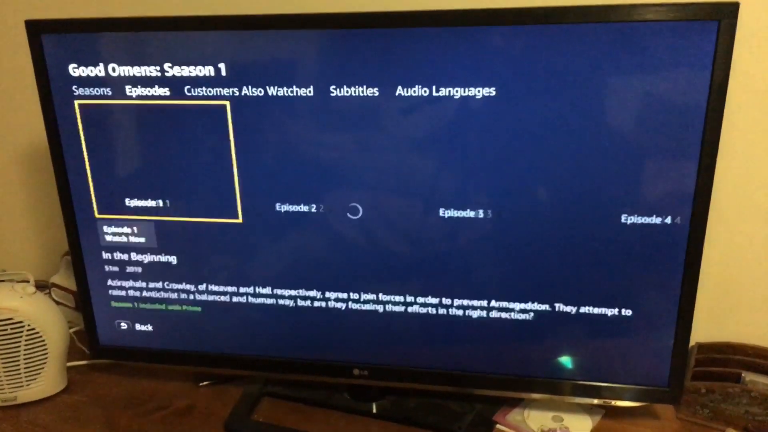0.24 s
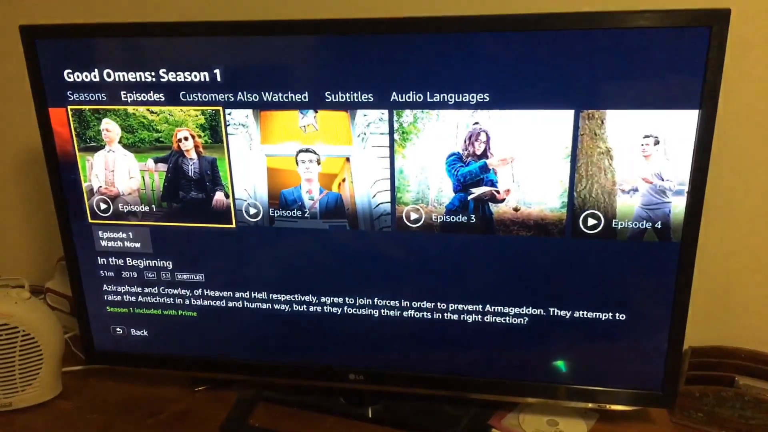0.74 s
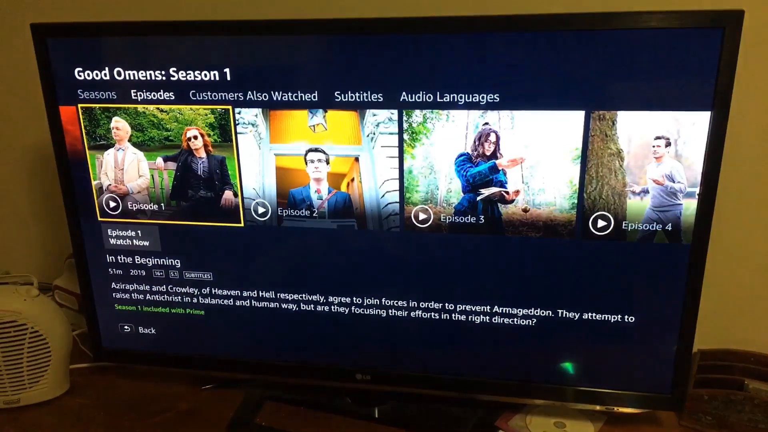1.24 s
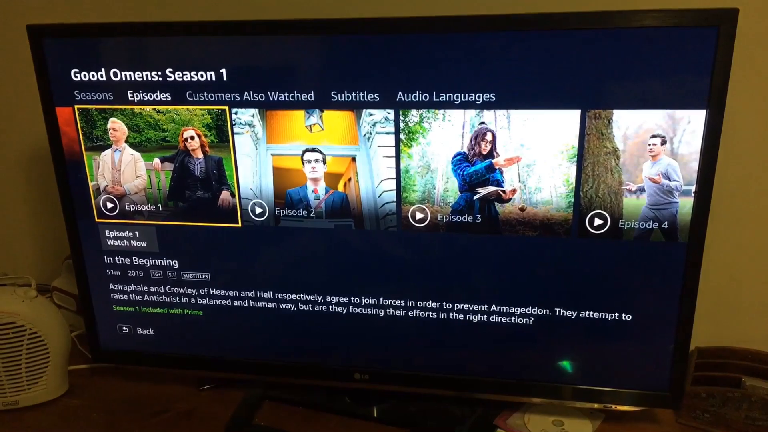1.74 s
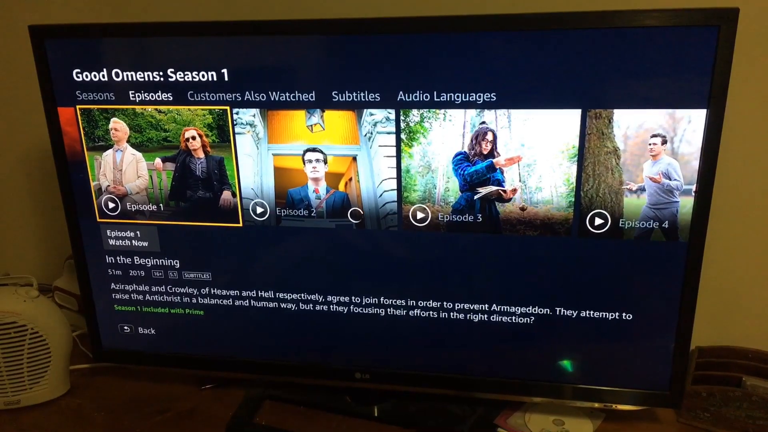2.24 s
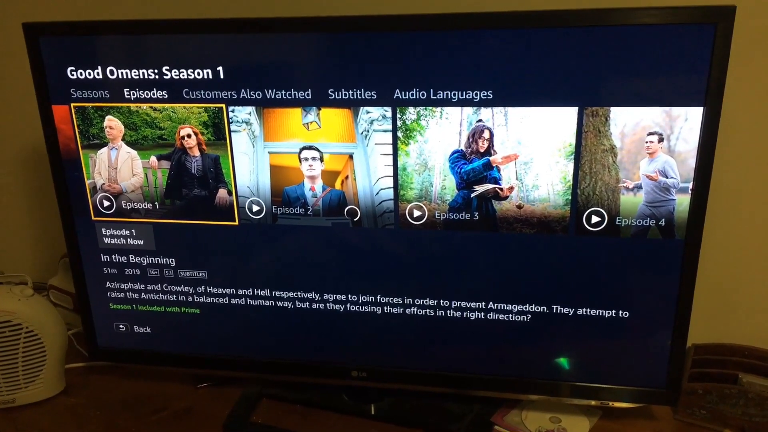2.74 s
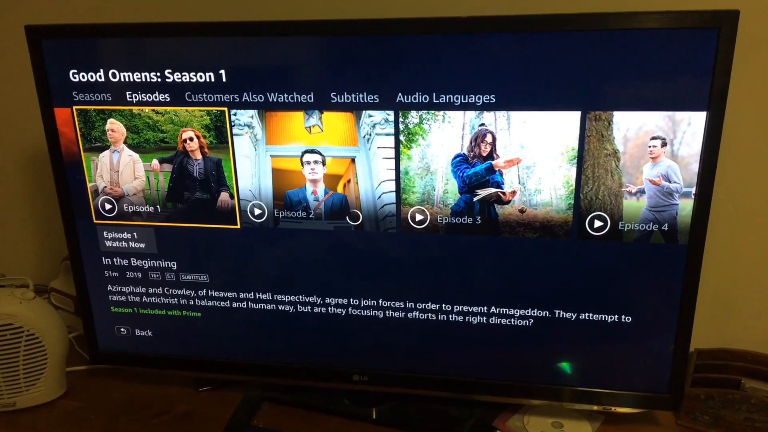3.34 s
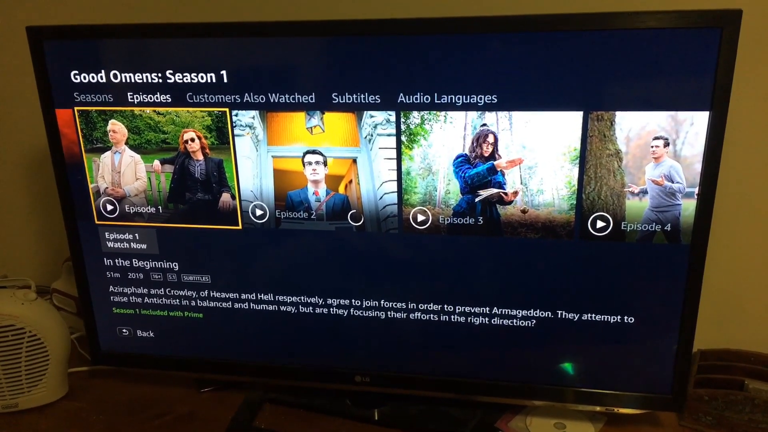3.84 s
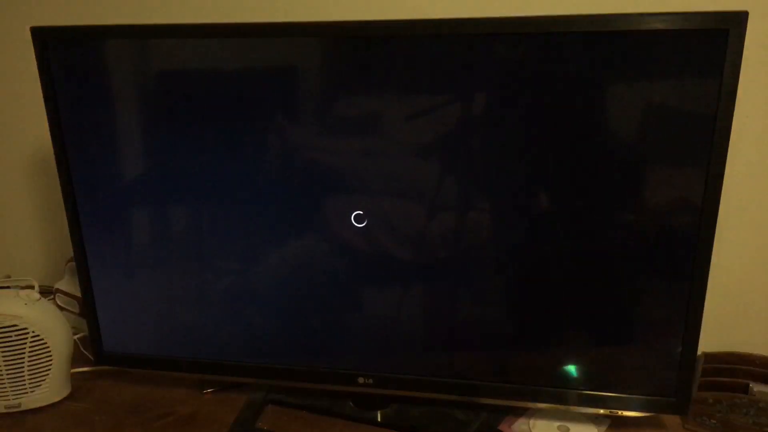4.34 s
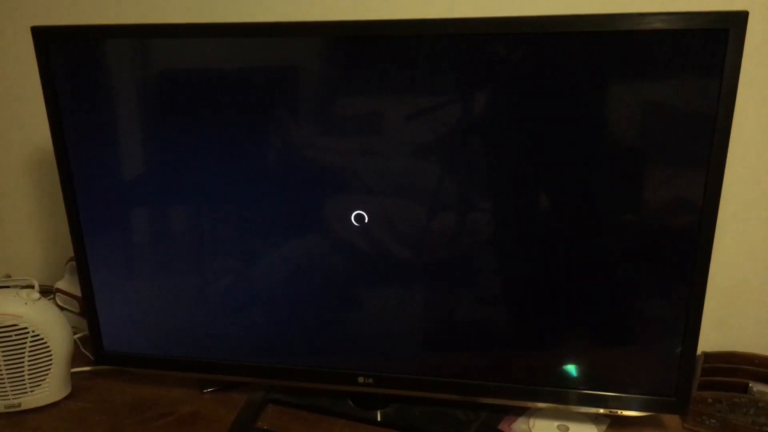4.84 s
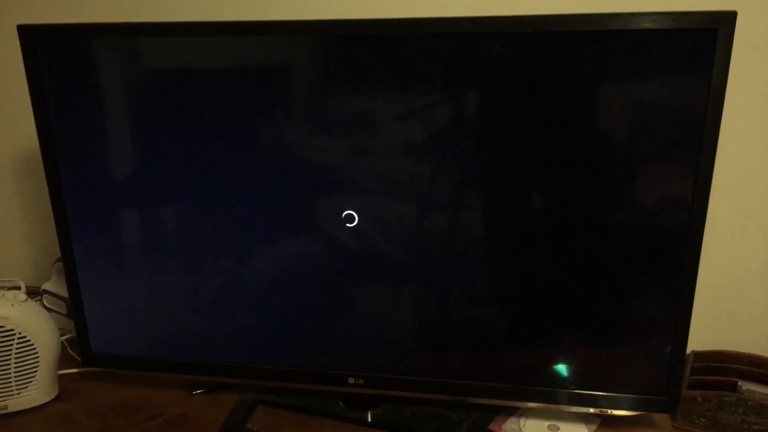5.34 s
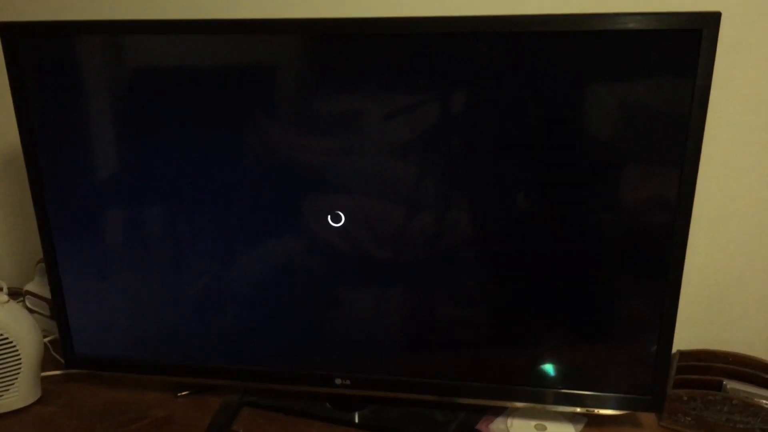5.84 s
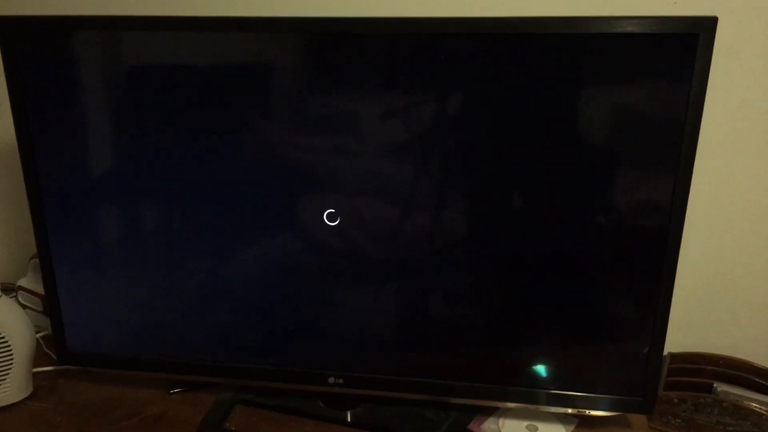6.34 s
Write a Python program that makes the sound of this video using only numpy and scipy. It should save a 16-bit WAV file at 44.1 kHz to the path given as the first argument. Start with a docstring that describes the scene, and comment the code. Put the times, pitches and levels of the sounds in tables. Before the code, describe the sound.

An appliance motor hums low and steady in a quiet room, throbbing slightly over a faint rumble and hiss. Against it, a remote control is handled, its sharp plastic clicks ringing briefly off the walls. A few light clicks and a soft rub of fingers come in the first second. At about 1.4 and 1.6 seconds one key goes down and up, dry and close to the microphone. A button pops at 2.7 seconds, and small clicks lead to the loudest snap at about 3.4, with a short hollow ring. Springy button pops bunch together around 4.5 seconds. A quick run of clicks follows from 5.3 to 5.8, then another firm snap at 6.2. Faint finger slides and light taps on the case continue to the end, at about 6.6 seconds.

```python
"""Sharp plastic clicks come from a remote control being handled in a quiet room.
Its keys and case snap and ring, springy domes pop under firm presses, and the walls answer briefly.
Fingers slide and tap on the plastic; one key goes down and up right beside the microphone, dry and close.
Behind it all, an appliance motor hums low, with a slight throb, over a faint rumble and hiss."""
import sys
import numpy as np
from scipy import signal
from scipy.fft import rfft, irfft, next_fast_len
from scipy.io import wavfile
from scipy.ndimage import map_coordinates

SR = 44100
rng = np.random.default_rng(int(sys.argv[2]) if len(sys.argv) > 2 else 0)


def int16_out(signal):
    """Quantize to a 16-bit WAV file."""
    q = np.round(np.clip(np.atleast_2d(signal).T, -1, 1) * 32767)
    wavfile.write(sys.argv[1], SR, q.astype(np.int16))


N = 291060  # 6.6 seconds


def amp(db):
    """Turn decibels into a number to multiply by."""
    return 10 ** (np.asarray(db) / 20)


def value_at(points, hz):
    """Read between (pitch_hz, value) points on a logarithmic pitch scale."""
    pitches, values = np.transpose(points)
    return np.interp(np.log(hz + 1), np.log(pitches + 1), values)


def wobble(rate_hz):
    """A smooth random curve that passes through rate_hz new values a second."""
    values = rng.standard_normal(int(N * rate_hz / SR) + 4)
    return map_coordinates(values, [np.arange(N) * rate_hz / SR])


def filtered(sound, gain_at):
    """Turn each frequency of a sound up or down by gain_at(hz)."""
    size = next_fast_len(N + SR // 2)
    return irfft(rfft(sound, size) * gain_at(np.fft.rfftfreq(size, 1 / SR)), size)[:N]


def coloured(noise, spectrum):
    """Shape noise with (pitch_hz, level_db) points, then set its average (rms) level to 1."""
    shaped = filtered(noise, lambda hz: amp(value_at(spectrum, hz)))
    return shaped / np.sqrt(np.mean(shaped ** 2) + 1e-20)


def swells(rows, rise_db_per_s, fall_db_per_s):
    """A volume curve: each event fades in up to its start, holds for its length, then fades out."""
    t = np.arange(N) / SR
    gain = np.zeros(N)
    for start_s, length_s, level_db in rows:
        before_s = np.maximum(start_s - t, 0)
        after_s = np.maximum(t - start_s - length_s, 0)
        gain += amp(level_db - rise_db_per_s * before_s - fall_db_per_s * after_s)
    return gain


def add(track, start_s, sound):
    """Mix a sound into the track at the given time."""
    start = max(round(start_s * SR), 0)
    part = track[start:start + len(sound)]
    part += sound[:len(part)]


# Tone of the building's rumble and of the hiss: pitch_hz, relative_db
RUMBLE_SPECTRUM = [(15, -34), (45, 13.5), (62, -1.5), (105, -5.5), (135, -5), (200, -5.5), (330, -10),
                   (520, -15), (1200, -33)]
HISS_SPECTRUM = [(100, -7), (400, -6.5), (800, 0), (2000, 0), (3200, -5), (4200, -5.5), (7000, -8.5),
                 (9300, -7.5), (10500, -11), (12500, -5.5), (15500, -8.5), (16500, -5.5)]
def room_air(rumble_db=-66, hiss_db=-66):
    """The building rumbles low under a smooth hiss."""
    rumble = amp(rumble_db) * coloured(rng.standard_normal(N), RUMBLE_SPECTRUM)
    hiss = amp(hiss_db) * coloured(rng.standard_normal(N), HISS_SPECTRUM)
    return rumble + hiss


# Jolts of the microphone: start_s, length_s, level_db
JOLTS = [(0, 0.018, -54), (3.25, .05, -62), (5.62, .15, -58.5), (6.4, .15, -56)]
# Tone of the shaking: pitch_hz, relative_db
SHAKE_SPECTRUM = [(8, -21), (20, 16), (30, -4.5), (45, -7.5), (62, 5), (100, -27), (200, -18), (500, -75)]
def microphone_shake(resting_db=-72):
    """The hand holding the microphone makes a deep rumble that swells with each jolt."""
    gain = amp(resting_db) + swells(JOLTS, rise_db_per_s=53, fall_db_per_s=49)
    return gain * coloured(rng.standard_normal(N), SHAKE_SPECTRUM)


# Weak tones above the hum: pitch_multiple, relative_db
OVERTONES = [(2, -30), (3, -54.5), (6, -55)]
# How deeply the hum throbs (a minus sign flips the beat): time_s, depth_db
THROB_DEPTH = [(0, 1.2), (4.3, 0), (4.6, -0.8), (6.6, 1.5)]
# Thin steady whines, in two matching lists: pitch_hz and level_db
WHINE_HZ = (90, 105.5, 199.8, 310.6)
WHINE_DB = (-76, -74, -78, -80.5)
def motor_hum(level_db=-42, pitch_hz=48.8, throb_hz=7.7, flutter_db=0.9):
    """A turning induction motor makes a low, throbbing tone, weak overtones and thin whines."""
    t = np.arange(N) / SR
    turn = 2 * np.pi * t  # phase of a 1 Hz tone
    overtones = sum(amp(db) * np.sin(multiple * pitch_hz * turn + 0.52 * wobble(2.38))
                    for multiple, db in OVERTONES)
    hum = np.sin(pitch_hz * turn) + overtones
    whine = sum(amp(db) * np.sin(hz * turn + 0.42 * wobble(2.62)) for hz, db in zip(WHINE_HZ, WHINE_DB))
    depth_db = np.interp(t, *np.transpose(THROB_DEPTH))
    throb_db = depth_db * np.sin(throb_hz * turn + wobble(1.81))
    unsteady_db = flutter_db * wobble(8.5)
    return np.sqrt(2) * (amp(level_db + throb_db + unsteady_db) * hum + whine)


# How long the room takes to fade by 60 dB: pitch_hz, fade_s
ROOM_FADE = [(200, 0.11), (600, 0.38), (1500, 0.36), (3000, 0.38), (6000, 0.38), (10000, 0.29),
             (16000, 0.2)]
def room_tail(build_s, late_db, late_stretch):
    """The walls' blurred answer, at energy 1; a faint part lasts late_stretch times as long."""
    hz, t, noise = signal.stft(rng.standard_normal(SR * 2 // 3), SR, nperseg=256)
    fade_s = value_at(ROOM_FADE, hz)[:, None]
    fade = amp(-60 * t / fade_s) + amp(late_db - 60 * t / (late_stretch * fade_s))
    tail = signal.istft(noise * fade, SR, nperseg=256)[1]
    age_s = np.arange(len(tail)) / SR
    tail *= 1 - np.exp(-(age_s / build_s) ** 2)
    return tail / np.linalg.norm(tail)


# Movements of the hands: start_s, length_s, level_db
RUSTLES = [(0, 0.6, -70), (3.08, 0.32, -68)]
# Tone of the rustle: pitch_hz, relative_db
RUSTLE_SPECTRUM = [(80, -14), (150, -5.5), (350, 5.5), (480, -9), (1000, -18.5)]
def hand_rustle(uneven_db=3.0):
    """A soft, dull rustle comes and goes as the hands move."""
    gain = swells(RUSTLES, rise_db_per_s=62, fall_db_per_s=110)
    return gain * amp(uneven_db * wobble(15)) * coloured(rng.standard_normal(N), RUSTLE_SPECTRUM)


# Fingers sliding on the plastic: start_s, length_s, relative_db
SLIDES = [(0.121, 0.69, -62), (1.093, 0.93, -70.5), (2.318, 0.034, -67.5), (3.1, .72, -63.5),
          (4.18, 0.64, -65), (5.354, 0.53, -63.5), (6.006, 0.059, -57), (6.286, .17, -51.5)]
# Tone of the rubbing: pitch_hz, relative_db
RUB_SPECTRUM = [(300, -25), (900, 0.5), (2000, 4), (4200, -1.5), (7000, -6.5), (16000, -14)]
def finger_slides(gain_db=-4, roughness=1.1, grain_samples=32):
    """Fingers stick and slip on the case, making faint grains of noise of very uneven strength."""
    noise = rng.standard_normal(N)
    strengths = np.exp(roughness * rng.standard_normal(N // grain_samples + 1) / 2)
    grains = noise * np.repeat(strengths, grain_samples)[:N]
    gain = amp(gain_db) * swells(SLIDES, rise_db_per_s=128, fall_db_per_s=128)
    return gain * coloured(grains, RUB_SPECTRUM)


# Notes left hanging by firm presses: start_s, pitch_hz, relative_db
HOLLOW_NOTES = [(.353, 3810, -57), (3.215, 855, -47.5), (3.351, 1200, -38.5), (3.352, 427, -54),
                (4.58, 865, -49), (6.186, 1470, -45)]
def hollow_case(decay_s=0.0038, gain_db=27):
    """A firm press sounds a short note in the hollow case, and the walls draw it out."""
    out, t = np.zeros(N), np.arange(SR // 25) / SR
    for start_s, pitch_hz, db in HOLLOW_NOTES:
        note = np.exp(-t / decay_s) * np.sin(2 * np.pi * pitch_hz * t)
        ring = signal.fftconvolve(note, room_tail(build_s=0.00037, late_db=-40, late_stretch=1.2))
        add(out, start_s, amp(db + gain_db) * ring / np.linalg.norm(ring))
    return out


# The close key going down, then up: start_s, level_db
KEY_STROKES = [(1.4025, -30.5), (1.5698, -31)]
# The tones it rings with: pitch_hz, relative_db, rise_s
KEY_TONES = [(7450, -2, 0.000082), (4450, -15.5, 0.00066), (2890, 0.5, 0.0005), (1870, -12.5, 0.001),
             (1270, -7.5, 0.00045), (855, -3, 0.00063), (540, -13, 0.00066), (290, -39, 0.00044)]
def close_key(room_db=-16, travel_at_1khz_s=0.00155):
    """High tones travel faster through bending plastic, so each stroke is a tiny falling chirp."""
    out, t = np.zeros(N), np.arange(SR // 50) / SR
    for start_s, level_db in KEY_STROKES:
        stroke = np.zeros(len(t))
        for pitch_hz, relative_db, rise_s in KEY_TONES:
            delay_s = travel_at_1khz_s * min((1000 / pitch_hz) ** 2, 1.4)
            age_s = np.maximum(t - delay_s, 0)
            swell = age_s / rise_s * np.exp(1 - age_s / rise_s)
            detuned_hz = pitch_hz * (1 + rng.normal(0, 0.0097))
            stroke += amp(level_db + relative_db) * swell * np.sin(2 * np.pi * detuned_hz * age_s)
        add(out, start_s, stroke)
        tail = room_tail(build_s=0.0045, late_db=-28, late_stretch=1.2)
        add(out, start_s, amp(room_db) * signal.fftconvolve(stroke, tail))
    return out


# Springy domes giving way under the keys: start_s, level_db
POPS = [(2.722, -29), (4.1492, -32), (4.4928, -23.5), (4.5734, -20), (5.4355, -31), (5.593, -40.5)]
def dome_pops(pitch_hz=2086, decay_s=0.0017, bass_cut_hz=1300, room_db=-3.5):
    """A dome buckles with one short, hard knock; it is too small to give off bass."""
    out, t = np.zeros(N), np.arange(SR // 50) / SR
    note = np.exp(-t / decay_s) * np.sin(2 * np.pi * pitch_hz * t)
    pop = signal.lfilter(*signal.butter(2, bass_cut_hz, 'high', fs=SR), note)
    for start_s, level_db in POPS:
        add(out, start_s, amp(level_db) * pop)
        tail = room_tail(build_s=0.0023, late_db=-45, late_stretch=1.1)
        add(out, start_s, amp(level_db + room_db) * signal.fftconvolve(pop, tail))
    return out


def snap(decay_s, samples=512):
    """A catch lets go in a burst of tiny slips, spread evenly over all pitches, at energy 1."""
    t = np.arange(samples) / SR
    fade = np.exp(-t / decay_s) * (1 - np.exp(-4 * t / decay_s))
    spectrum = rfft(rng.standard_normal(samples) * fade)
    burst = irfft(spectrum / np.abs(spectrum)) * np.sqrt(fade)
    return burst / np.linalg.norm(burst)


def shortest_ring(gains):
    """The quickest ring with these gains from low to high pitch (minimum phase), at energy 1."""
    cepstrum = irfft(np.log(np.maximum(gains, 1e-6)))
    half = len(cepstrum) // 2
    cepstrum[1:half] *= 2  # folding onto the first half packs the sound at its start
    cepstrum[half + 1:] = 0
    ring = irfft(np.exp(rfft(cepstrum)))
    return ring / np.linalg.norm(ring)


# Five bands that set a click's tone (knock, body, mid treble, snap, fizz): pitch_hz
BAND_HZ = [800, 1800, 3600, 6700, 12000]
# Pitches at which the plastic case rings: pitch_hz, width_hz, relative_db
CASE_RESONANCES = [(965, 67, -10), (1170, 1500, 1), (2053, 290, -5), (3020, 190, -9.5), (4154, 260, 2.5),
                   (6100, 1300, -2.5), (9040, 700, -2.5), (11900, 1170, -4)]
def case_ring(knock_db, body_db, snap_db, fizz_db):
    """The case rings after one click; the grip shifts its resonances a little each time."""
    hz = np.fft.rfftfreq(1024, 1 / SR)
    bands = zip(BAND_HZ, (knock_db, body_db, 0, snap_db, fizz_db))
    tone = [(80, knock_db - 12), (330, knock_db - 4.5), *bands, (16000, fizz_db - 4)]
    peaks = np.zeros(len(hz))
    for pitch_hz, width_hz, db in CASE_RESONANCES:
        gripped_db = db + rng.normal(0, 2.5)
        gripped_hz = pitch_hz * (1 + rng.normal(0, 0.025))
        peaks += amp(gripped_db) / (1 + (2 * (hz - gripped_hz) / width_hz) ** 2)
    return shortest_ring(amp(value_at(tone, hz)) * (1 + peaks))


# Echoes from hard surfaces near the hand: delay_s, relative_db
ECHOES = [(.0061, -16), (.0088, -11), (0.012, -14), (0.0199, -9.5)]
def add_click(track, start_s, level_db, room_db, ring, hit_gain_db=18.5, tail_gain_db=16.5):
    """One click: a faint, muffled lead-in, a double snap ringing the case, echoes and the room."""
    bass_cut = signal.butter(1, 700, 'high', fs=SR)  # a small case gives off little bass
    treble_cut = signal.butter(1, 2200, fs=SR)
    burst = np.zeros(SR // 100)
    add(burst, 0, snap(decay_s=0.00061))
    add(burst, 0.001212, amp(-3) * snap(decay_s=0.0011))
    hit = amp(level_db + hit_gain_db) * signal.fftconvolve(burst / np.linalg.norm(burst), ring)
    add(track, start_s, signal.lfilter(*bass_cut, hit))
    # the click's shielded direct sound arrives just before its louder reflection
    lead_in = signal.lfilter(*treble_cut, signal.fftconvolve(snap(decay_s=0.0016), ring))
    lead_in_db = level_db + hit_gain_db - 7 + min(room_db, 0)
    add(track, start_s - 0.0046, amp(lead_in_db) * lead_in)
    for delay_s, echo_db in ECHOES:
        add(track, start_s + delay_s, amp(echo_db - 2 + room_db / 2) * hit)
    tail = room_tail(build_s=0.0024, late_db=-47, late_stretch=1.1)
    add(track, start_s, amp(level_db + room_db + tail_gain_db) * signal.fftconvolve(tail, ring))


def case_ticks(typical_db=-57, spread_db=9.5):
    """The case gives one faint tick at a random moment in each finger slide."""
    out = np.zeros(N)
    for start_s, length_s, _ in SLIDES:
        level_db = rng.normal(typical_db, spread_db)
        ring = case_ring(knock_db=-9, body_db=2, snap_db=-4, fizz_db=-1)
        add_click(out, start_s + length_s * rng.random(), level_db, room_db=4, ring=ring)
    return out


# Finger taps: start_s, relative_db, body_db (compared with the mid treble)
TAPS = [(3.0058, -43.5, 28), (5.594, -49, 13), (5.901, -45, -6), (5.9967, -48, 10), (6.3143, -51, 0),
        (6.323, -38.5, 1), (6.5187, -47.5, -1)]
def finger_taps(room_db=-12.5):
    """Fingers tap the case near the microphone, dull and dry."""
    out = np.zeros(N)
    for start_s, level_db, body_db in TAPS:
        ring = case_ring(knock_db=body_db, body_db=body_db, snap_db=-16, fizz_db=-9)
        add_click(out, start_s, level_db, room_db, ring)
    return out


# Clicks of the keys and case: start_s, relative_db, body_db, snap_db, fizz_db
# (the last three are compared with the mid treble)
CLICKS = [(0.2623, -53, -9, -8, -37), (0.3535, -32.5, -12, -6.5, -16), (0.6037, -36, -2.5, -7, -10),
          (0.6694, -33, 14.5, 8, -3.5), (0.6751, -33, -2.5, -16, -16), (1.039, -55.5, 13, -2, -6),
          (1.182, -54.5, 7, -1, -36), (1.332, -54.5, -1, -15, -15), (1.453, -45, 8, 2, 1),
          (1.594, -40.5, 0.5, -4, -0.5), (1.7593, -53.5, 0.5, -15, -27), (1.9971, -45.5, 12.5, -9, -24),
          (2.4725, -43, -3, -18, -25), (2.6941, -36.5, -10, -8, -10.5), (2.7217, -32, 8, 0, 0),
          (3.1587, -44.5, 0.5, -4, -5), (3.185, -40.5, 0, 4, 3), (3.214, -32, 0, -7, -4.5),
          (3.3202, -42, -2, -9, -17), (3.3506, -12.5, -4.5, -7.5, 1), (3.566, -40, 16, 8, 19.5),
          (3.628, -35.5, 7, 1, -4), (4.0126, -50, 6, -1.5, 2), (4.1017, -53, 3, -9, -19),
          (4.1493, -40, 1, -3, -16.5), (4.3915, -52, -8, -42, -23), (4.4768, -51, -3, -8, -26),
          (4.4935, -33, -2, -5.5, -3.5), (4.5375, -31.5, -3, -2, -8.5), (4.545, -33.5, -1, 2, 0),
          (4.573, -31, -4, -16, -14.5), (4.713, -45, 11, 4, -6), (4.9443, -44, -9, 5, -7),
          (4.955, -44.5, -5, 14, -25), (5.029, -46, 10, 5, 5), (5.3016, -37, -6.5, -4.5, -3.5),
          (5.3344, -31.5, 2.5, 9.5, 8.5), (5.3629, -33.5, 2, 5, -5), (5.3912, -31.5, -5.5, -2, -18),
          (5.4355, -36.5, 11, 1, 1), (5.495, -32.5, -9, -1.5, 0.5), (5.672, -28, 4, 6, 5.5),
          (5.8019, -39.5, 0.5, -1.5, -10), (6.1854, -20.5, -0.5, -1, -1), (6.4564, -33.5, -2, -5, 5.5)]
def key_clicks(ordinary_db=-34.5, ordinary_room_db=4, room_loss_per_db=0.041):
    """Keys and case click, each with its own tone; a firmer click has a smaller share of room sound."""
    out = np.zeros(N)
    for start_s, level_db, body_db, snap_db, fizz_db in CLICKS:
        room_db = ordinary_room_db - room_loss_per_db * (level_db - ordinary_db)
        knock_db = body_db - 14
        add_click(out, start_s, level_db, room_db, case_ring(knock_db, body_db, snap_db, fizz_db))
    return out


def scene():
    """All the sounds meet at one microphone."""
    background = room_air() + microphone_shake() + motor_hum()
    hands = hand_rustle() + finger_slides() + case_ticks() + finger_taps()
    presses = hollow_case() + close_key() + dome_pops() + key_clicks()
    return (background + hands + presses)[None]


def record(dry):
    """The recorder steeply cuts off the very highest treble."""
    top_hz = 16000
    return np.array([filtered(channel, lambda hz: 1 / (1 + (hz / top_hz) ** 120)) for channel in dry])


dry = scene()
out = record(dry)
int16_out(out)
```